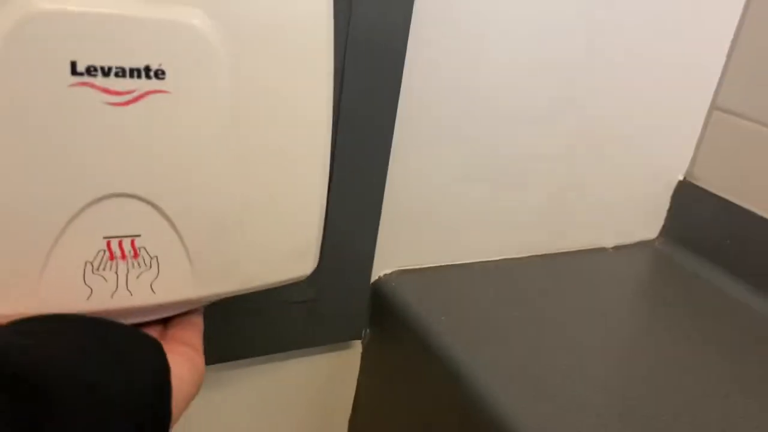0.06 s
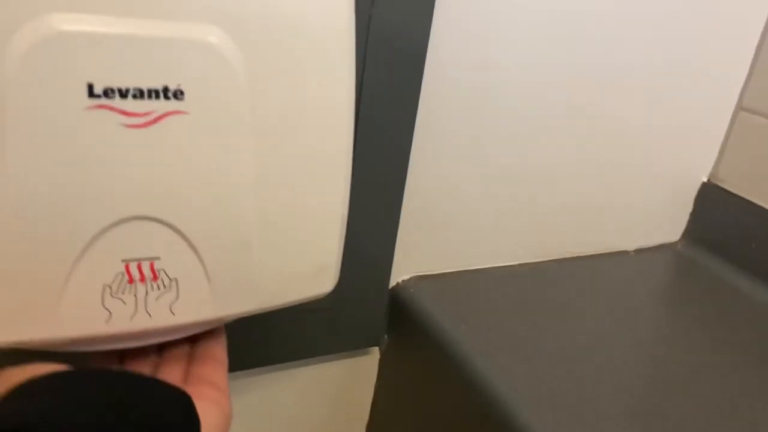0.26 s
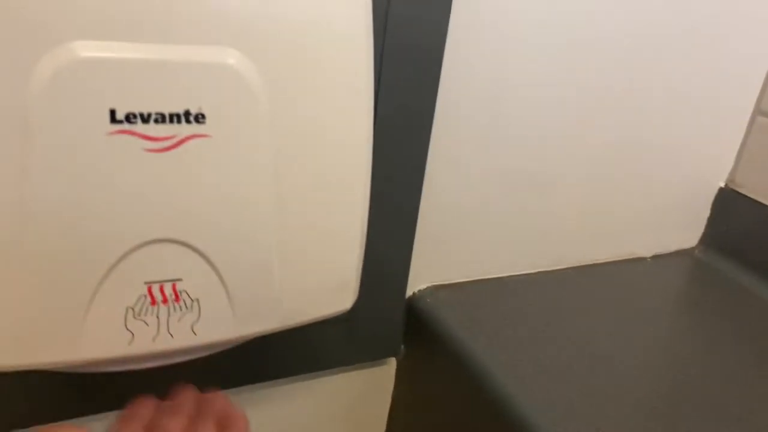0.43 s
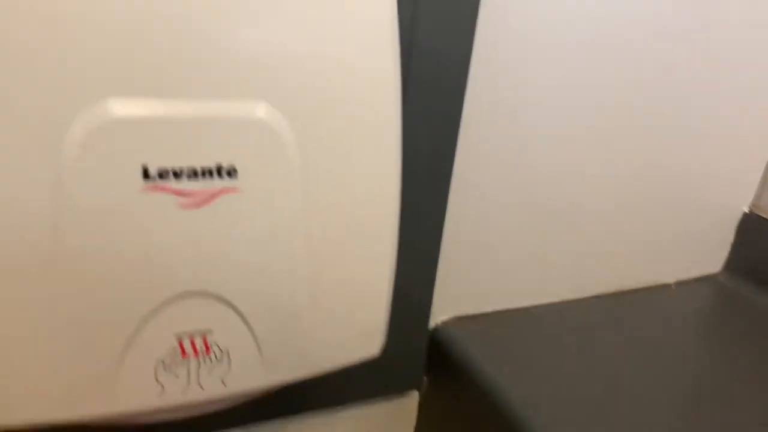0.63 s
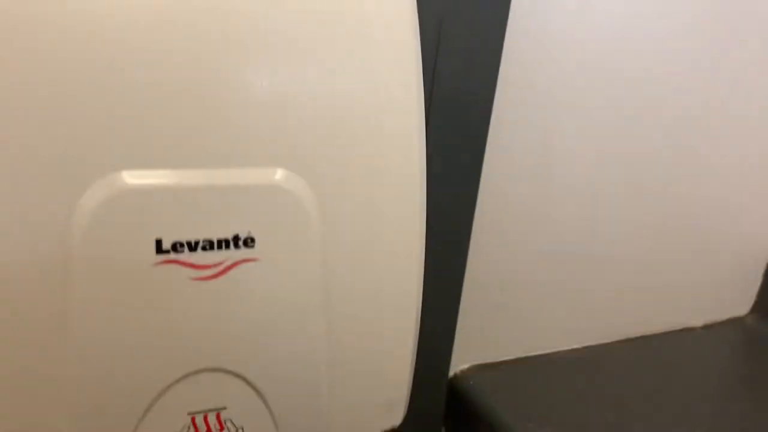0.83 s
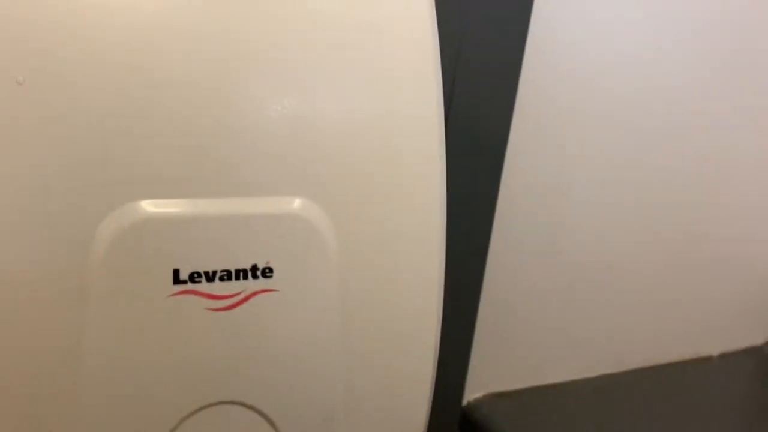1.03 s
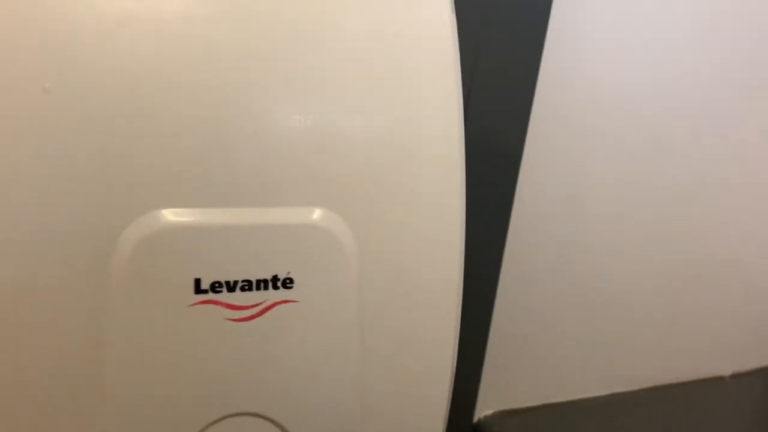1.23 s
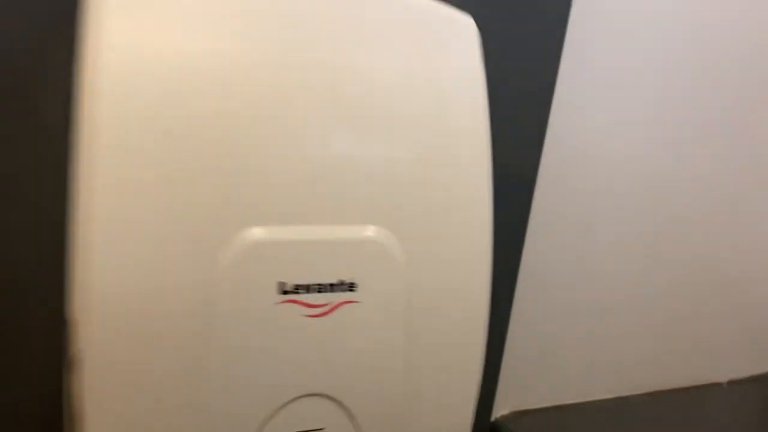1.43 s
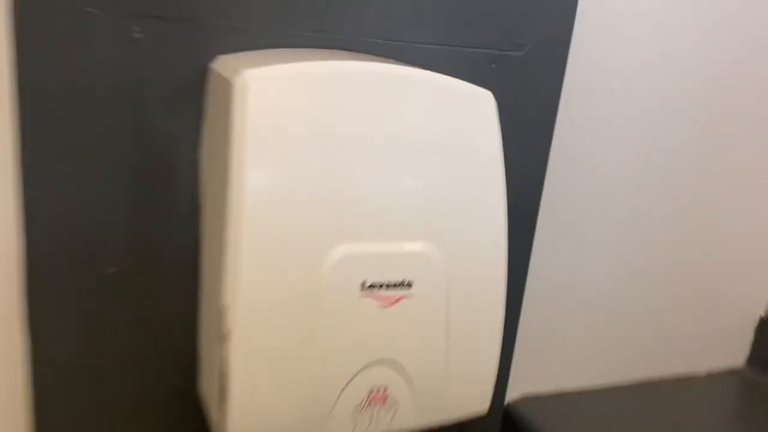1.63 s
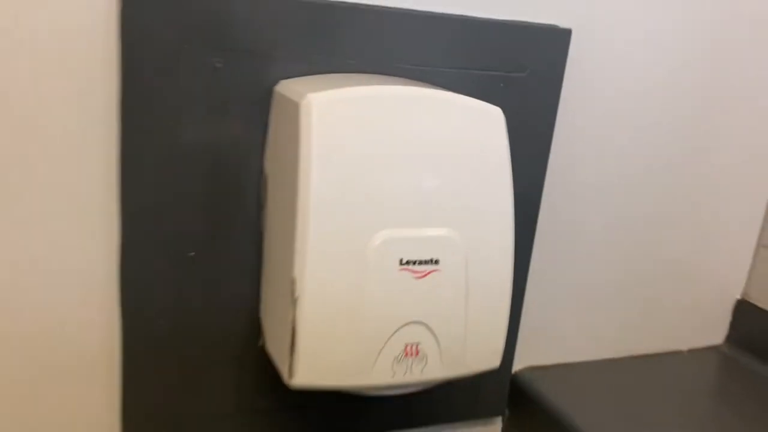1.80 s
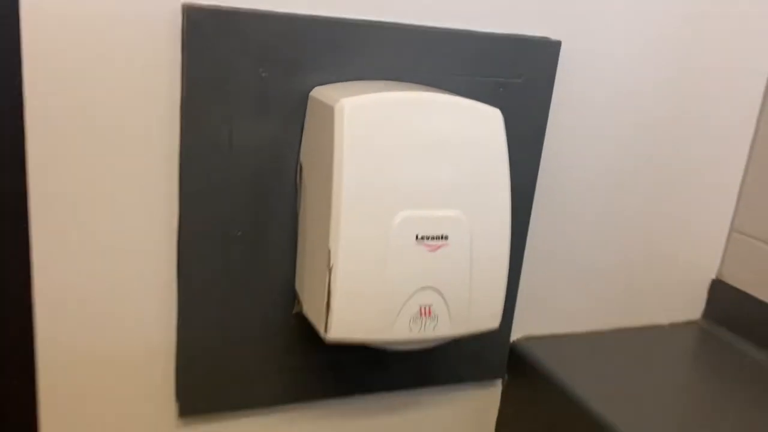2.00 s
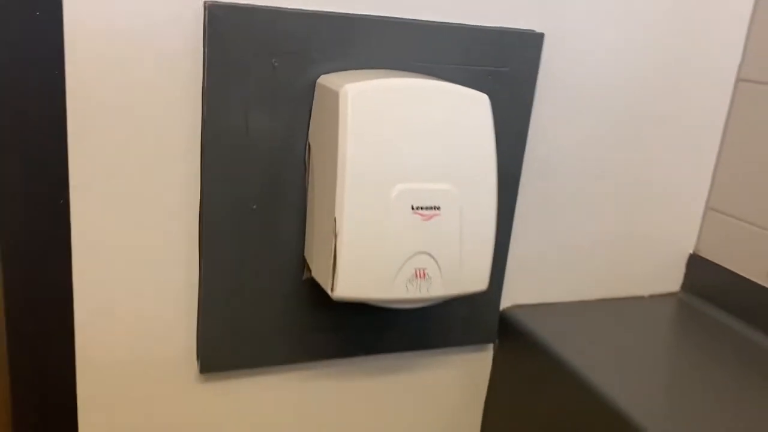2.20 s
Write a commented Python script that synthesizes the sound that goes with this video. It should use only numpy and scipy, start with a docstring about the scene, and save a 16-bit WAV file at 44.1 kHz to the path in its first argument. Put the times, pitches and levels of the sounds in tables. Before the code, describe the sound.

In a small tiled restroom, an electric hand dryer spins up for just over a second, its airy roar and whine climbing, then falling away. The close microphone retreats with faint handling bumps, and the room sounds boomier.

```python
"""A wall-mounted hand dryer spins up for just over a second, then winds down, in a small tiled restroom.
Fan speed drives the rush of air and the pitch of the shaft hum, blade tone and whine; the duct and
casing ring at fixed pitches. A hollow drone shows through at the start and end, and the hard walls
answer. A hand-held microphone bumps softly and backs away, bringing the room's boom forward."""
import sys
import numpy as np
from scipy import signal
from scipy.fft import rfft, irfft, next_fast_len
from scipy.io import wavfile
from scipy.ndimage import uniform_filter1d, map_coordinates

SR = 44100
rng = np.random.default_rng(int(sys.argv[2]) if len(sys.argv) > 2 else 0)


def to_wav(s):
    """Save 16-bit WAV."""
    ch = np.atleast_2d(s).T  # columns
    pcm = np.round(np.clip(ch, -1, 1) * 32767)  # PCM
    wavfile.write(sys.argv[1], SR, pcm.astype(np.int16))


N = 103635
FULL_SPEED_HZ = 80  # shaft turns a second


def amp(db):
    """Decibels to gain."""
    return 10 ** (np.asarray(db) / 20)


def unit(x):
    """Scale to rms 1."""
    return x / np.sqrt(np.mean(x ** 2) + 1e-20)


def along(points, hz):
    """Read (hz, value) points on a log frequency axis."""
    point_hz, values = np.transpose(points)
    return np.interp(np.log(hz + 1), np.log(point_hz + 1), values)


def curve(rows):
    """Automation lanes: one value per sample for each column after the time."""
    time_s, *lanes = np.transpose(rows)
    return np.squeeze([np.interp(np.arange(N) / SR, time_s, lane) for lane in lanes])


def wobble(rate):
    """A smooth random curve, rate knots a second."""
    return map_coordinates(rng.standard_normal(4096), [np.arange(N) * rate / SR], mode="wrap")


def filtered(x, response):
    """EQ x with a gain that is a function of frequency."""
    size = next_fast_len(N + SR // 2)
    return irfft(rfft(x, size) * response(np.fft.rfftfreq(size, 1 / SR)), size)[..., :N]


def shape(points):
    """EQ curve through (freq_hz, gain_db) points, falling steeply outside them."""
    low, high = points[0][0], points[-1][0]
    return lambda hz: amp(along(points, hz)) * np.minimum(1, np.minimum(hz / low, high / (hz + 1))) ** 6


def resonances(modes):
    """EQ curve of (centre_hz, width_hz, gain_db) resonances, summed in power."""
    def peak(hz, centre, width):
        return hz * width / (centre ** 2 - hz ** 2 + 1j * hz * width)
    return lambda hz: np.sqrt(sum(np.abs(amp(db) * peak(hz, c, w)) ** 2 for c, w, db in modes))


def wall_ripple(hz, depth_db=4.5, spacing_hz=22.38):
    """Standing waves between hard walls: fine peaks and dips, shallower below 2 kHz."""
    pattern = np.tanh(map_coordinates(rng.standard_normal(4096), [hz / spacing_hz], mode="wrap"))
    return amp(depth_db * np.clip(hz / 2000, 0, 1) * pattern)


def rush(response, patchy_db):
    """Coloured stereo noise of rms 1, with turbulent patches in time and frequency."""
    # likeness of the spaced microphones: freq_hz, correlation (clipped below)
    likeness = [(60, 0.93), (170, 0.76), (420, 0.72), (680, 0.17), (880, 0.48), (1150, 0.19), (1750, -0.49),
                (2200, 0.49), (3400, 0.49), (4300, 0.69), (5600, 0.28), (7000, 1), (7900, 0.39),
                (8400, -1.36), (9500, -1.74), (10100, 0.73), (11800, 0.98), (12600, -1.5), (13600, -0.73),
                (14600, 0.4)]

    def mid_side_eq(hz):
        angle = np.arccos(np.clip(along(likeness, hz), -.98, 1)) / 2
        return response(hz) * np.array([np.cos(angle) * wall_ripple(hz), np.sin(angle) * wall_ripple(hz)])

    spectra = signal.stft(rng.standard_normal((2, N)), nperseg=512)[2]
    patches = uniform_filter1d(rng.standard_normal(spectra.shape[1:]), size=6, axis=0)
    patches = uniform_filter1d(patches, size=12, axis=1)
    turbulence = signal.istft(spectra * amp(patchy_db * unit(patches)), nperseg=512)[1][:, :N]
    mid, side = filtered(turbulence, mid_side_eq)
    return unit(np.array([mid + side, mid - side]))


def tone(base_hz, order, rough, spread=0):
    """A harmonic of base_hz, shaken by rough radians of turbulence, spread radians apart in stereo."""
    phase = 2 * np.pi * order * np.cumsum(base_hz) / SR + rough * wobble(70)
    return np.sqrt(2) * np.sin(phase + spread * np.array([[.5], [-.5]]))


def room(x, wet_db, t60_s=0.43):
    """A source plus the ring of the tiled walls, different at each ear."""
    t = np.arange(SR // 2) / SR
    tail = rng.standard_normal((2, len(t))) * amp(-60 * t / t60_s)
    wet = signal.fftconvolve(x, tail / np.linalg.norm(tail[0]), axes=1)[:, :N]
    return x + amp(wet_db) * np.std(x) * unit(wet)


def background(floor_db=-42, hiss_db=-41, fade_db_per_s=85):
    """Restroom room tone, and a brief hiss dying away at the start."""
    # colours of the room tone and of the hiss: freq_hz, gain_db
    floor_eq = [(40, -8), (160, -18), (260, -2), (330, -10.5), (430, -20), (620, -14.5), (780, -9),
                (1000, -19), (1800, -44), (4500, -29.5), (8000, -85), (15000, -60)]
    hiss_eq = [(600, -17), (1350, -5), (1700, -35), (2600, -15), (3300, -28), (3900, -20.5), (4700, -17.5),
               (6000, -23.5), (8000, -24), (12000, -37)]
    hiss = amp(hiss_db - fade_db_per_s * np.arange(N) / SR) * rush(shape(hiss_eq), patchy_db=2.0)
    return amp(floor_db) * rush(shape(floor_eq), patchy_db=3.5) + hiss


def drone():
    """A hollow note that swells to a hoot, inside a fluttering resonance."""
    # the clear note: time_s, pitch_hz, level_db
    note = [(0, 386, -42), (.15, 388, -43.5), (.22, 386, -37.5), (.29, 385, -27.5), (.37, 382, -42),
            (.43, 390, -31.5), (.5, 386, -52), (.56, 386, -35), (.8, 386, -48), (2.2, 395, -64),
            (2.29, 397, -37.5), (2.35, 393, -41.5)]
    # the flutter around it: time_s, level_db
    flutter_fader = [(0, -41.5), (.12, -33), (.23, -30), (.29, -28), (.34, -25), (.39, -32), (.6, -31.5),
                     (.8, -36.5), (1.6, -51), (1.98, -43.5), (2.22, -47), (2.29, -37.5), (2.35, -39)]
    # its hollow body: centre_hz, width_hz, gain_db
    modes = [(194.6, 25, -10.5), (319, 19, -5.5), (380, 56, -1), (510, 120, -11)]
    pitch_hz, note_db = curve(note)
    flutter = rush(lambda hz: resonances(modes)(hz) / (1 + (hz / 700) ** 4), patchy_db=1.9)
    return amp(note_db) * tone(pitch_hz, order=1, rough=0.36) + amp(curve(flutter_fader)) * flutter


def handling_rumble():
    """Soft low bumps of the moving hand-held microphone."""
    # the bumps: time_s, level_db
    fader = [(0, -47), (.08, -49), (.14, -38), (.22, -49), (.32, -46), (.39, -45), (.48, -49), (.65, -35),
             (.9, -48), (1.5, -45), (1.93, -42.5), (2.15, -55.5), (2.35, -61)]
    return amp(curve(fader)) * rush(shape([(45, 1.5), (80, 6.2), (125, 2.0)]), patchy_db=1.0)


def flow(response, speed, level_db, rise_db, fall_db, lag_s, patchy_db):
    """Air noise: up rise_db per doubling of speed under power, down fall_db per halving when coasting."""
    t = np.arange(N) / SR
    slope_db = np.where(np.arange(N) < np.argmax(speed), rise_db, fall_db)
    gain_db = np.interp(t - lag_s, t, slope_db * np.log2(speed / FULL_SPEED_HZ))
    return amp(level_db + gain_db) * rush(response, patchy_db)


def air(speed):
    """The air stream roars, rings the duct and casing, and leaves the nozzle as hiss and fizz."""
    # colours of the stream, low to high: freq_hz, gain_db
    roar_eq = [(100, -12.5), (135, -13), (170, -9), (260, -12), (450, -1), (570, -6.5), (700, -9),
               (790, -4), (950, -2.5), (1150, -4.5), (1290, -8), (1400, -2.5), (1520, -11.5), (1750, -19.5)]
    hiss_eq = [(1700, -0.5), (2100, 3), (2330, -3.5), (2560, 0), (2800, 3.5), (3080, -3.5), (3400, -4.5),
               (3850, -6.5), (4300, -3), (4900, -4.5), (5400, -6), (6100, -12), (7000, -12.5), (7800, -13)]
    fizz_eq = [(7800, -2.5), (10000, -2.5), (11500, 1), (13000, -6), (15700, -13)]
    # resonances of duct and casing: centre_hz, width_hz, gain_db
    duct_modes = [(177, 12, -4), (230.5, 16, -1), (816, 4.9, -1), (918, 29, -2), (990, 28, -3),
                  (1060, 47, -3), (1245, 28, -2)]
    casing_modes = [(1626, 34, 5), (1930, 60, -8), (2050, 100, 1), (2095, 16, -6), (2392, 70, -2),
                    (2750, 50, -6), (2910, 30, -7), (3190, 24, -7.5), (4044, 34, -6), (4220, 13, -15)]
    # the microphone drifts in and out of the nozzle's bright sound: time_s, treble_gain_db
    nozzle_aim = [(0, -18), (.25, -5.5), (.45, -1.5), (.65, 1), (.88, 1.5), (.98, 3.5), (1.12, 2),
                  (1.22, 1.5), (1.38, 0.5), (1.55, 0.5), (1.75, -0.5), (2.0, -1.5), (2.35, -3.5)]
    roar = flow(shape(roar_eq), speed, level_db=-22, rise_db=18.5, fall_db=21, lag_s=.002, patchy_db=1.6)
    duct = flow(resonances(duct_modes), speed,
                level_db=-31, rise_db=10.5, fall_db=30.5, lag_s=.004, patchy_db=3.5)
    casing = flow(resonances(casing_modes), speed,
                  level_db=-35, rise_db=12.5, fall_db=16, lag_s=.004, patchy_db=2.0)
    hiss = flow(shape(hiss_eq), speed,
                level_db=-30.5, rise_db=16, fall_db=15.5, lag_s=-.019, patchy_db=1.6)
    fizz = flow(shape(fizz_eq), speed,
                level_db=-45.5, rise_db=10.5, fall_db=11, lag_s=-.015, patchy_db=0.8)
    return roar + duct + hollow_band() + casing + amp(curve(nozzle_aim)) * (hiss + fizz)


def hollow_band(width_hz=123, side_db=-5):
    """A narrow resonance in the roar that glides as the microphone moves against a nearby wall."""
    # the glide: time_s, centre_hz, level_db
    sweep = [(0, 951, -56), (.36, 972, -43.5), (.48, 976, -40), (.62, 1011, -29), (.8, 946.6, -37),
             (.95, 870, -33), (1.08, 930, -30), (1.3, 889.4, -35), (1.45, 908, -37), (1.55, 1149, -36.5),
             (1.76, 1065, -37), (1.9, 982, -49), (2.35, 806, -55)]
    centre_hz, level_db = curve(sweep)
    low_noise = filtered(rng.standard_normal((2, 2, N)), lambda hz: 1 / (1 + (2 * hz / width_hz) ** 4))
    phase = 2 * np.pi * np.cumsum(centre_hz) / SR
    mid, side = low_noise[0] * np.cos(phase) + low_noise[1] * np.sin(phase)  # shifted up to the centre
    return amp(level_db) * unit(mid + amp(side_db) * np.array([side, -side]))


def fan(speed):
    """Hum, blade tone, whine and weak overtones, all harmonics of the turning shaft."""
    # hum of the unbalanced fan: time_s, level_db
    hum_fader = [(0, -77), (.35, -55), (.5, -43), (.56, -29), (.62, -22), (.77, -24.5), (1.08, -19.5),
                 (1.46, -20.5), (1.56, -26), (1.68, -28.5), (1.76, -27), (1.87, -29.5), (1.96, -51),
                 (2.05, -40), (2.2, -67), (2.35, -73)]
    # blade tone, hooting where it crosses resonances: time_s, level_db, roughness_rad
    blade_lanes = [(0, -59, 1), (.45, -45, .7), (.55, -40, 0.76), (.65, -41, 0.51), (.72, -29.5, 0.77),
                   (.85, -37.5, 0.51), (.915, -21.5, .2), (.97, -34, 0.29), (1.03, -27, .2),
                   (1.09, -20, 0.049), (1.13, -21, .05), (1.22, -42.5, 0.34), (1.29, -24.5, 0.13),
                   (1.41, -31.5, .6), (1.46, -31.5, 0.44), (1.58, -38, 0.65), (1.8, -44, .7),
                   (1.9, -59, 0.68), (2.35, -47, .8)]
    # whine, clean only at top speed: time_s, level_db, roughness_rad
    whine_lanes = [(.3, -70, 2), (.49, -36, 1.1), (.64, -39, 2.1), (.88, -36, 1.23), (.99, -31, 1.3),
                   (1.07, -33, 1.1), (1.14, -29, .7), (1.22, -33, 0.88), (1.275, -22, 0.17),
                   (1.37, -27, 0.17), (1.43, -40, 0.74), (1.64, -46, 1.2), (1.7, -31, 1.3),
                   (1.78, -34, 0.68), (1.87, -47, 1.77), (2.11, -62, 1), (2.16, -37, 0.704),
                   (2.22, -46, .9), (2.28, -39, .7), (2.35, -49, .9)]
    # weak overtones: multiples of the shaft speed, and level_db of each at full speed
    weak_orders = (2, 3, 4, 6)
    weak_db = (-56.5, -47, -40, -43)
    blade_db, blade_rough = curve(blade_lanes)
    whine_db, whine_rough = curve(whine_lanes)
    hum = amp(curve(hum_fader)) * tone(speed, order=1, rough=0.018)
    blade = room(amp(blade_db) * tone(speed, order=5, rough=blade_rough, spread=0.66), wet_db=-12.5)
    whine = room(amp(whine_db) * tone(speed, order=18, rough=whine_rough, spread=1.2), wet_db=-4.5)
    weak = sum(amp(db) * tone(speed, order=k, rough=0.56) for k, db in zip(weak_orders, weak_db))
    return hum + blade + whine + weak * (speed / FULL_SPEED_HZ) ** 3


def cover_ring(speed, growth_power=2.44):
    """The cover rings thinly in two unsteady modes, louder the faster the fan turns."""
    # the modes at full speed: pitch_hz, level_db
    modes = [(2016, -50), (2104, -51.5)]
    ring = sum(amp(db + 6.8 * wobble(12.75)) * tone(np.full(N, hz), order=1, rough=1.0)
               for hz, db in modes)
    return room(ring * (speed / FULL_SPEED_HZ) ** growth_power, wet_db=3.5)


def room_boom():
    """Low modes of the small room, stirred by the air."""
    # the room's modes: centre_hz, width_hz, gain_db
    modes = [(188.4, 5.3, -2), (217, 14, -6), (294, 9.3, -1), (440, 18, -11), (539.7, 31, -8.5),
             (635.3, 31, -8), (714, 20, -5), (794, 22, 0.5)]
    # the boom comes forward as the microphone backs away: time_s, level_db
    fader = [(0, -75), (1.4, -51), (1.7, -33.5), (1.98, -38.5), (2.15, -38.5), (2.35, -52)]
    boom = rush(lambda hz: resonances(modes)(hz) / (1 + (hz / 1100) ** 4), patchy_db=-0.5)
    return amp(curve(fader)) * boom


def scene():
    """One short run of the dryer, and the room around it."""
    # the fan spins up, then coasts: time_s, shaft_hz
    spin = [(0, 21.84), (.2, 34.48), (.42, 51.5), (.6, 60), (.72, 66.3), (.85, 71), (1.0, 75.3),
            (1.15, 78.46), (1.3, 80.6), (1.4, 80.2), (1.48, 74.8), (1.6, 65.4), (1.7, 60.1), (1.78, 57.8),
            (1.88, 54.86), (1.98, 49.26), (2.13, 43.7), (2.35, 39)]
    speed = uniform_filter1d(curve(spin), size=2205, mode="nearest")  # smoothed over 50 ms
    dryer = air(speed) + fan(speed) + cover_ring(speed)
    return dryer + drone() + room_boom() + handling_rumble() + background()


def record(dry, drift_db_per_s=-0.7, drift_zero_s=0.16, top_hz=15750):
    """The band-limited microphones lean left, and the balance drifts rightward as they back away."""
    # stereo lean: freq_hz, left_over_right_db
    lean = [(60, 1), (150, 1.5), (350, 2), (700, 4.5), (1400, 2), (2800, 2.5), (5600, 2.5), (9000, 0.5)]
    drift = amp(np.outer([.5, -.5], drift_db_per_s * (np.arange(N) / SR - drift_zero_s)))
    return filtered(dry * drift, lambda hz: amp(np.outer([.5, -.5], along(lean, hz))) * (hz < top_hz))


dry = scene()
out = record(dry)
to_wav(out)
```